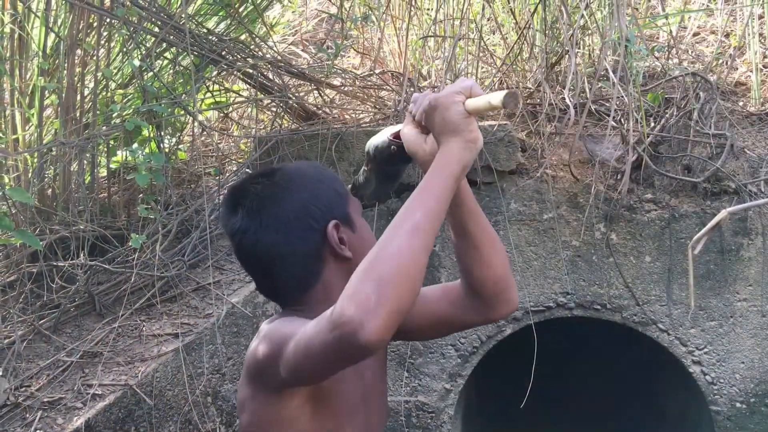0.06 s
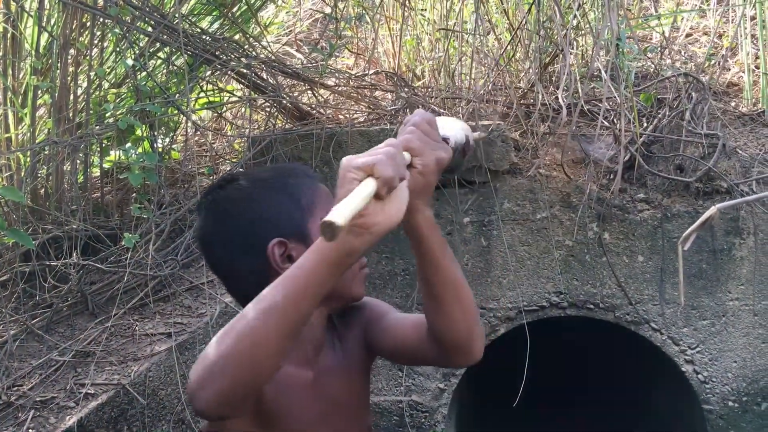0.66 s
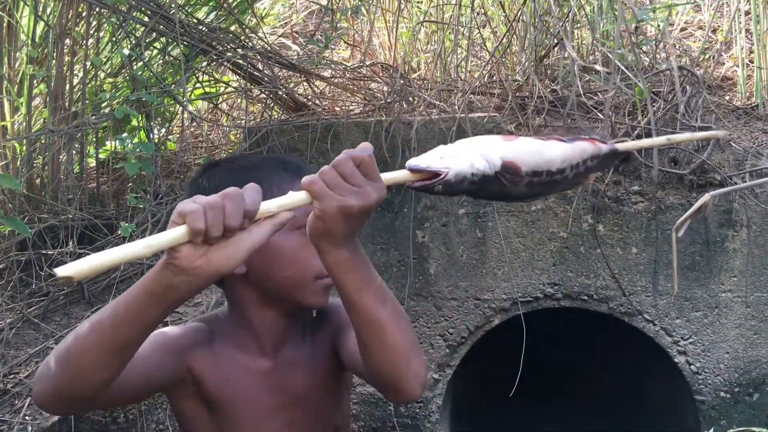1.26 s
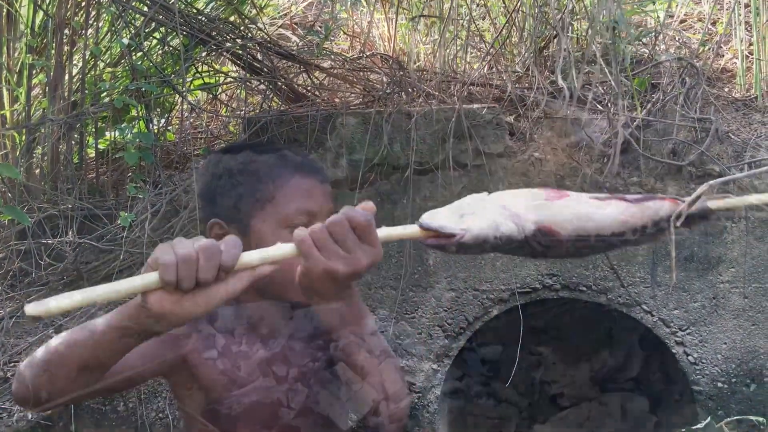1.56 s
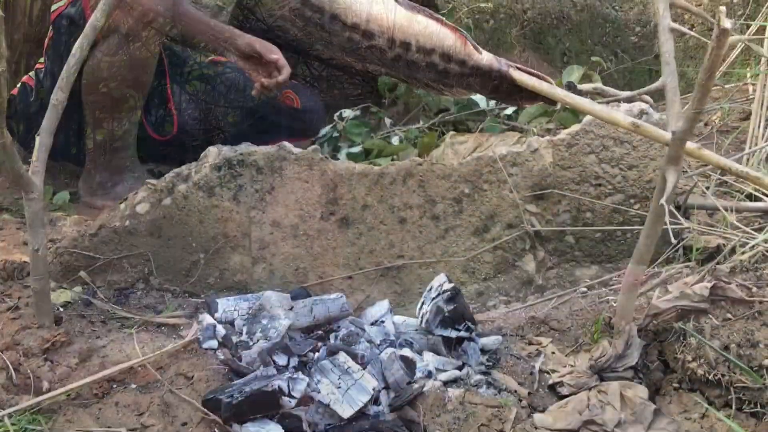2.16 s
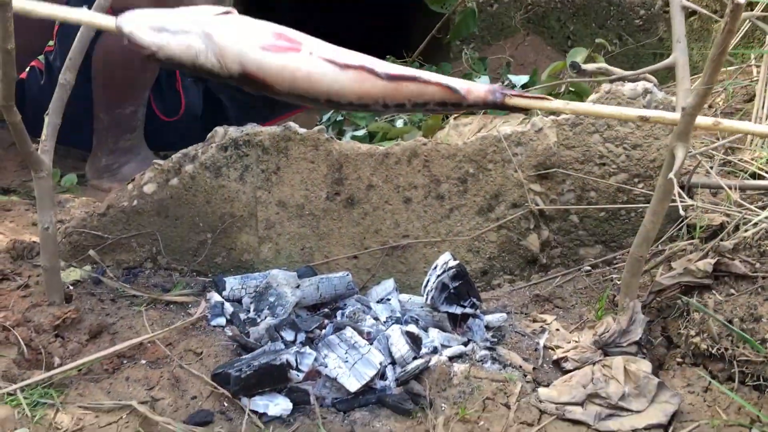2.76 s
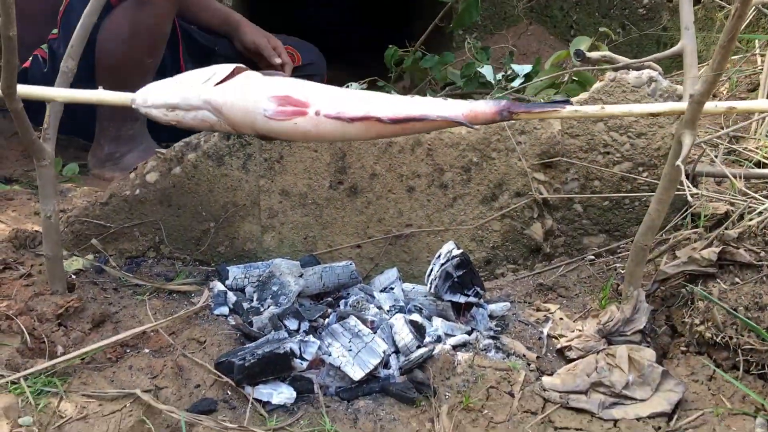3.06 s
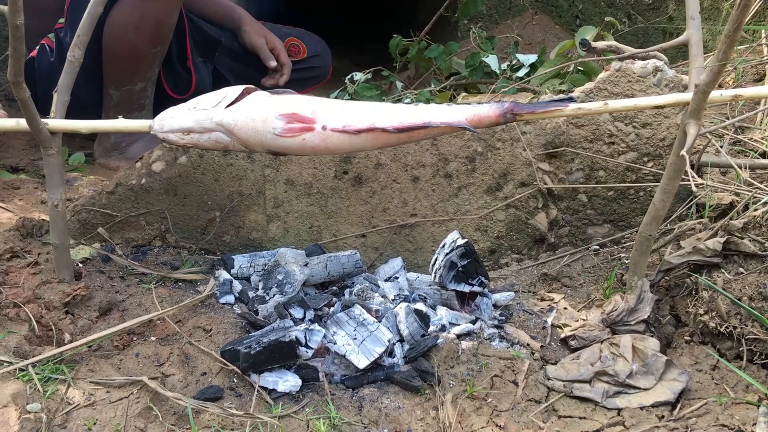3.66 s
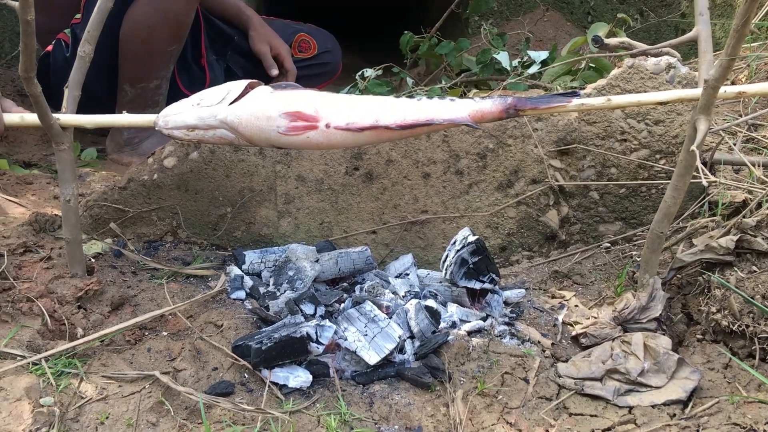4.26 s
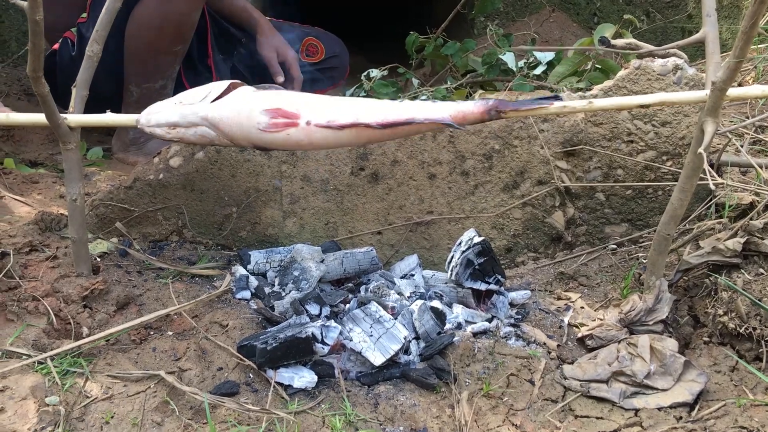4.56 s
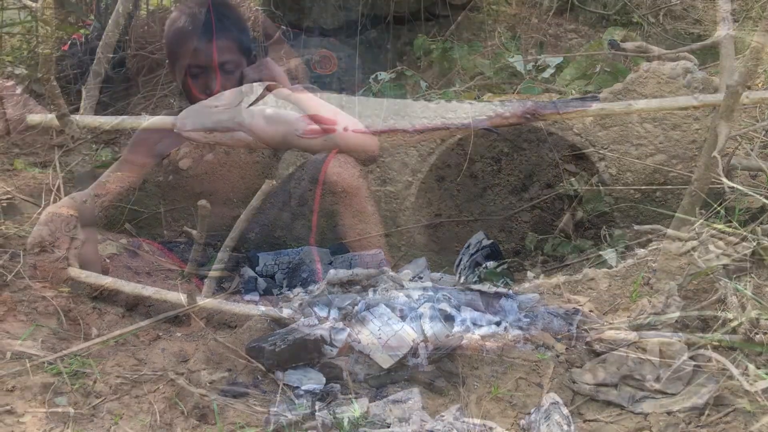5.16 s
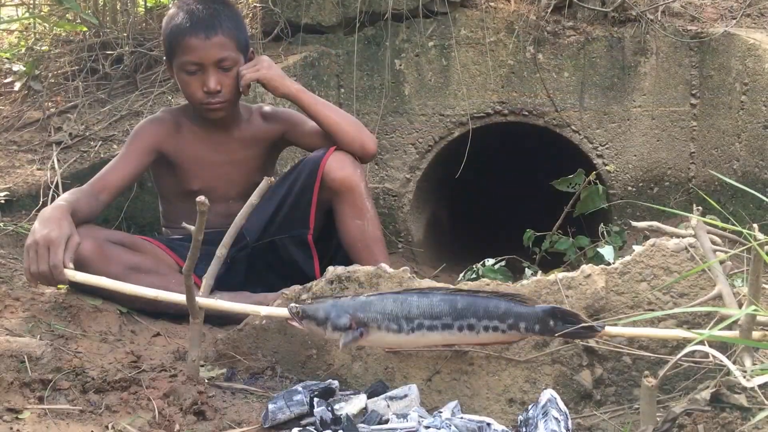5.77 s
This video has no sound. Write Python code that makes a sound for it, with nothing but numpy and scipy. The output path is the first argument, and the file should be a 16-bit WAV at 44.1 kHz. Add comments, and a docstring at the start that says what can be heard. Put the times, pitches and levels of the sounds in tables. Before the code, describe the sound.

Close, irregular cracks and soft hissing from hot coals outdoors, while a far engine thuds faintly in the breeze.

```python
"""Sharp, close snaps of glowing charcoal, with spurts of hiss, a fine fizz and faint ticks, outdoors.
The snaps come from coals cracking, and the loudest overload the microphone; tiny cracks make the fizz,
flaking ash the ticks. Far off, a slow one-cylinder pump engine thuds. Low wind blows and dry brush
rustles. Birds chirp, peep and hoot, insects drone and trill, and a faint hum comes and goes."""
import sys
import numpy as np
from scipy import signal
from scipy.fft import rfft, irfft
from scipy.io import wavfile
from scipy.ndimage import uniform_filter1d

SR = 44100
rng = np.random.default_rng(int(sys.argv[2]) if len(sys.argv) > 2 else 0)


def master(y):
    """Save y as 16-bit WAV."""
    cut = np.clip(np.atleast_2d(y).T, -1, 1)
    pcm = np.round(cut * 32767)  # scale
    wavfile.write(sys.argv[1], SR, pcm.astype(np.int16))


N = 255764
TIME = np.arange(N) / SR

# Steady fizz of the coals. Each row: time in seconds, relative level in dB.
GLOW_LEVEL = [(0, -55.5), (.32, -59.5), (.36, -48), (1.2, -46), (1.9, -48.5), (4.7, -52), (5.35, -52.5),
              (5.8, -58)]


def coal_snaps(body_hz=1900, crack_t60_s=0.004, resonance_db=9.0, resonance_octaves=0.17,
               crumble_db=-10, scatter_db=-15, scatter_t60_s=0.066, far_db=-29, far_t60_s=0.18):
    """Sharp snaps of coal (release, tiny fractures, scatter), and two short spurts of hiss near 0.8 s."""
    # Each row: start in seconds, relative level in dB, thump (below 700 Hz), knock (near 1.2 kHz) and
    # top (above 8 kHz) in dB, crumbling t60 in seconds, the piece's resonance in Hz.
    snaps_and_spurts = [(0.103, -38.5, -11, 6, 14, 0.013, 11700), (0.2013, -40, -12, -8, -3, 0.0084, 5270),
                        (0.343, -6.5, -6.5, -3.5, -2, 0.0064, 4700),
                        (0.3482, -11.5, -4, -4.5, -8.5, 0.022, 4500),
                        (0.505, -19, -22, -4, 2, 0.0068, 7400),
                        (0.69, -18.5, -21, -10.5, -4, 0.0056, 13500),
                        (0.6995, -28.5, -12, -9, -2, 0.006, 5000),
                        (0.7567, -15.5, -36, -6, -4.5, 0.0077, 9300),
                        (0.765, -20.5, -7, -14, 1, 0.025, 2900.0),
                        (0.806, -28, -15, -12, -2.5, 0.058, 6500.0), (0.8866, -31, -4, -5, 0, 0.006, 4430),
                        (1.011, -13.5, -7, -2.5, 2, 0.011, 9100), (1.0174, -22, -7, -7, -5, 0.0051, 9750),
                        (1.2792, -29.5, -15, -11, -8, 0.0065, 15000.0),
                        (1.3012, -11, -30, -9, -0.5, 0.0075, 4800), (1.363, -10.5, 5, -5, 1.5, 0.015, 4260),
                        (1.4778, -3, -1.5, -1, -10, 0.014, 1190), (1.525, -27.5, -8, -8, -3, 0.01, 11800.0),
                        (1.6067, -6, 0.5, -2.5, -1, 0.021, 6540),
                        (1.7944, -29.5, -17, -5.5, -1.5, 0.0058, 7260),
                        (2.0132, -12.5, -8, -12.5, 1, 0.014, 2900),
                        (2.1863, -1, -0.5, -9.5, -9, 0.017, 3240),
                        (2.2872, -10, -8.5, -6.5, -4.5, 0.0089, 8150),
                        (2.3032, -16, -17, -12, 1, 0.0058, 3700), (2.3528, -8.5, -8, -13.5, 5, 0.013, 3700),
                        (2.5502, -30, -3, -16, -3, 0.0057, 5700), (2.6806, -35, -6, -10, -1, 0.049, 5100.0),
                        (3.214, -35.5, -11.0, -12.0, -1.5, 0.008, 11200),
                        (3.244, -36, -12, -22, -2, 0.011, 11300.0),
                        (3.429, -22, 1.5, -11, 0.5, 0.009, 6700), (3.7294, -34, -10.0, -25, 4, 0.02, 4270),
                        (3.7589, -26, -19, -0.5, 0, 0.011, 2600.0),
                        (3.8243, -42, -6.0, -2, 12, 0.009, 2600.0),
                        (4.2628, -40.1, -11, -13.0, 4, 0.017, 12700.0),
                        (4.6053, -31.5, -4, -31, -1, 0.0058, 7850),
                        (4.642, -27, -10, -11.5, 1, 0.025, 2400.0)]
    # Spectrum common to all of them. Each row: frequency in Hz, gain in dB.
    snap_spectrum = [(40, -15.5), (130, -6.5), (260, 1.5), (480, 2), (720, 1.5), (1000, 2.5), (1750, 0.5),
                     (2300, -4), (2750, -11.5), (3400, -2.5), (7000, -1.5), (9200, 0), (10600, -3),
                     (14500, 1)]
    size = 8192
    out, t = np.zeros(N), np.arange(size) / SR
    bin_hz = np.arange(size // 2 + 1) * SR / size + 1
    lowpass, highpass = (signal.butter(2, body_hz, kind, fs=SR) for kind in ("low", "high"))
    release = signal.lfilter(*lowpass, signal.unit_impulse(size))
    common_db = spectrum_db(snap_spectrum, size)

    def burst(t60_s):
        """Fading noise of unit energy."""
        noise = rng.uniform(-1.1, 1, size) * undb(-60 * t / t60_s)
        return noise / np.linalg.norm(noise)

    for start_s, level_db, thump_db, knock_db, top_db, crumble_t60_s, piece_hz in snaps_and_spurts:
        crack = release + signal.lfilter(*highpass, burst(crack_t60_s))
        # Longer crumbling is louder and scatters more sound off ground and wall.
        heft = crumble_t60_s / 0.0059
        tail = heft * undb(crumble_db) * burst(crumble_t60_s) + undb(far_db) * burst(far_t60_s)
        tail += undb(scatter_db + 3 * np.log2(heft)) * burst(scatter_t60_s)
        tail = signal.lfilter(*signal.butter(1, 650, "high", fs=SR), tail)
        # Each piece has its own colour; the tail keeps only a share of it.
        balance = [(480, thump_db), (950, knock_db), (1800, knock_db),
                   (3600, 0), (7000, 0), (10500, top_db)]
        peak_db = resonance_db / (1 + (np.log2(bin_hz / piece_hz) / resonance_octaves) ** 2)
        piece_db = spectrum_db(balance, size) + peak_db
        sound = ring(crack, common_db + piece_db) + ring(tail, common_db + 0.7 * piece_db)
        attack_rms = np.sqrt(np.mean(sound[:SR // 333] ** 2))  # first 3 ms
        add(out, start_s, sound * undb(level_db + 3.0) / attack_rms)
    return out


def ember_fizz(grains_per_s=600, grain_t60_s=0.0028, flutter_db=1.68):
    """Countless tiny cracks merge into a fizz; the louder it grows, the grittier it gets."""
    # Swells of hiss. Each row: peak time in seconds, half width in seconds, relative level in dB.
    spurts = [(0, 0.022, -45.5), (.51, 0.052, -45), (.775, 0.1, -41), (.985, 0.064, -39.5),
              (2.24, 0.038, -44.5), (2.5, 0.18, -47), (4.56, .06, -50.5)]
    # Each row: frequency in Hz, gain in dB.
    fizz_spectrum = [(1200, -10.5), (2800, -5.5), (3800, -1), (5000, -2), (6800, 1.5), (7900, -3.5),
                     (9200, 1), (10400, -7), (11800, -0.5), (15500, -4.5)]
    power = undb(curve(GLOW_LEVEL)) ** 2
    for peak_s, width_s, spurt_db in spurts:
        power += undb(spurt_db) ** 2 * np.exp(-((TIME - peak_s) / width_s) ** 2)
    fizz_db = 10 * np.log10(power)
    cracks = rng.random(N) < grains_per_s / SR
    crack_db = 4.2 * np.minimum(rng.exponential(size=N), 4.5)
    t = np.arange(SR // 200) / SR
    grain = np.sign(rng.standard_normal(len(t))) * undb(-60 * t / grain_t60_s)
    grains = signal.fftconvolve(cracks * undb(crack_db), grain)[:N]
    grit = undb(-6 + 0.4 * (fizz_db + 46))  # ratio of grains to smooth hiss
    fizz = (rng.standard_normal(N) + grit * unit(grains)) / np.sqrt(1 + grit ** 2)
    return colour(fizz, fizz_spectrum) * undb(fizz_db + 1.1 + flutter_db * walk(40))


def ash_ticks(ticks_per_s=8, over_glow_db=2.0, spread_db=7, low_hz=6500, high_hz=14000, t60_s=0.008):
    """Ash flakes spring off at random: faint, bright ticks that grow and fade with the glow."""
    out, t = np.zeros(N), np.arange(SR // 100) / SR
    for when, pitch, weakness in rng.random((int(ticks_per_s * N / SR), 3)):
        flake_hz = low_hz * (high_hz / low_hz) ** pitch
        burst = rng.standard_normal(len(t)) * undb(-60 * t / t60_s)
        tick = signal.lfilter(*signal.iirpeak(flake_hz, 2, fs=SR), burst)
        add(out, when * N / SR, unit(tick) * undb(over_glow_db - spread_db * weakness))
    return out * undb(curve(GLOW_LEVEL))


def pump_engine(firings_per_s=8.1, exhaust_hz=60, sag=0.22, thud_width_s=0.014,
                knock_hz=315, knock_lag_s=0.016, knock_width_s=0.0032):
    """Each firing gives a soft exhaust thud that sags in pitch, with a knock just after it."""
    # Steady running. Each row: first firing in seconds, end in seconds, exhaust in dB, knock in dB.
    stretches = [(.013, 2.3, -45.5, -65), (2.361, 4.63, -49, -63), (4.665, 5.8, -46.5, -56.5)]
    out, t = np.zeros(N), np.arange(SR // 8) / SR
    lead_s = 0.05
    age_s = t - lead_s  # zero at the thud's peak
    thud_envelope = np.exp(-0.5 * (age_s / thud_width_s) ** 2)
    knock_envelope = np.exp(-0.5 * ((age_s - knock_lag_s) / knock_width_s) ** 2)
    phase = 2 * np.pi * np.cumsum(exhaust_hz * np.exp(-sag * age_s / lead_s)) / SR
    for start_s, end_s, exhaust_db, knock_db in stretches:
        for firing_s in np.arange(start_s, end_s, 1 / firings_per_s):
            late, strong, thud_detune, hard, knock_detune = rng.standard_normal(5)
            thud = unit(thud_envelope * np.sin(phase * (1 + 0.13 * thud_detune)))
            knock = unit(knock_envelope * np.sin(2 * np.pi * knock_hz * (1 + 0.049 * knock_detune) * t))
            firing = thud * undb(exhaust_db + 0.9 * strong) + knock * undb(knock_db + 2.4 * hard)
            add(out, firing_s - lead_s + 0.0019 * late, firing)
    return out


def breeze(bout_edge_s=0.034):
    """Low wind and the rustle of dry brush, each fluttering on its own."""
    # Each row: time in seconds, relative level in dB.
    wind_level = [(0, -51.5), (.6, -51), (.85, -48.5), (1.75, -49.5), (2.25, -46), (2.85, -50.5),
                  (4.2, -50), (4.55, -46), (4.75, -53), (5.8, -50.5)]
    # Each row: start in seconds, end in seconds, relative level in dB.
    rustle_bouts = [(.345, 1.905, -49), (.95, 1.04, -44), (1.03, 1.15, -49), (2.19, 2.68, -52.5),
                    (4.72, 6.1, -58)]
    # Each row of both spectra: frequency in Hz, gain in dB.
    wind_spectrum = [(20, -29), (45, 0.5), (110, 4), (190, -3.5), (330, -5), (450, -12), (900, -22.5),
                     (2000, -41)]
    rustle_spectrum = [(200, -29), (400, -2), (580, 2), (780, -1.5), (1100, 0), (1600, -2.5), (2600, -5),
                       (4000, -11), (9000, -34)]
    rustle_power = undb(-58) ** 2  # floor between bouts
    for start_s, end_s, bout_db in rustle_bouts:
        rustle_power += (undb(bout_db) * gate(start_s, end_s, bout_edge_s)) ** 2
    wind = colour(rng.standard_normal(N), wind_spectrum)
    rustle = colour(rng.standard_normal(N), rustle_spectrum)
    wind *= undb(curve(wind_level) + 3.0 + 0.85 * walk(14))
    rustle *= np.sqrt(rustle_power) * undb(1.5 + 0.76 * walk(24.91))
    return wind + rustle


def faint_hum(hz=188.8, level_db=-55):
    """A low tone that sets in, wavers and stops."""
    return tone(hz, undb(level_db) * gate(1.92, 3.8), waver=0.0142, waver_per_s=14, flutter_db=2.1)


def bird_chirp():
    """Two notes swell and fade while their pitch climbs, fast at first, then levelling off."""
    # Each row: start in seconds, length in seconds, first and last pitch in Hz, level in dB.
    notes = [(4.291, .1, 5550, 6610, -41), (4.37, .055, 6900, 8000, -53)]
    out = np.zeros(N)
    for start_s, length_s, first_hz, last_hz, level_db in notes:
        progress = np.clip((TIME - start_s) / length_s, 0, 1)
        hz = last_hz + (first_hz - last_hz) * (1 - progress) ** 1.7
        gain = undb(level_db) * np.sin(np.pi * progress)
        out += tone(hz, gain, waver=0.012, waver_per_s=440, flutter_db=2.1)
    return out


def bird_peeps(hz=2800, attack_s=0.0041, t60_s=0.045, lower_db=-13):
    """A far bird's quick, rough peeps, with a weaker partial an octave below."""
    # Each row: start in seconds, level in dB.
    peeps = [(5.625, -40), (5.66, -53), (5.735, -53.5)]
    gain = np.zeros(N)
    for start_s, level_db in peeps:
        rise = np.clip((TIME - start_s) / attack_s, 0, 1)
        decay_db = 60 * np.maximum(TIME - start_s - attack_s, 0) / t60_s
        gain += rise * undb(level_db - decay_db)
    upper = tone(hz, gain, waver=0.046, waver_per_s=700, flutter_db=2.9)
    lower = tone(hz / 2, gain * undb(lower_db), waver=0.041, waver_per_s=700, flutter_db=2.8)
    return upper + lower


def bird_hoot(hz=525, level_db=-59):
    """One short, far hoot."""
    return tone(hz, undb(level_db) * gate(0.08, 0.32), waver=0.0315, waver_per_s=82, flutter_db=2.5)


def foliage_echo(calls, echo_db=-7, t60_s=0.26):
    """Leaves and a wall smear distant calls into a short tail."""
    t = np.arange(SR // 4) / SR
    tail = rng.standard_normal(len(t)) * undb(-60 * t / t60_s)
    return calls + undb(echo_db) * signal.fftconvolve(calls, tail / np.linalg.norm(tail))[:N]


def insects(trill_hz=9200, trill_db=-63, drone_hz=7100, drone_db=-65):
    """One insect's thin trill and the drone of others in the brush."""
    trill = tone(trill_hz, undb(trill_db) * gate(5.63, 5.9), waver=0.014, waver_per_s=980, flutter_db=2.3)
    drone = tone(drone_hz, undb(drone_db) * gate(1.9, 4.5), waver=0.02, waver_per_s=1100, flutter_db=3.6)
    return trill + drone


def tone(hz, gain, waver, waver_per_s, flutter_db):
    """A sine that wanders in pitch and level; waver is the rms fraction of the pitch."""
    phase = 2 * np.pi * np.cumsum(hz * (1 + waver * walk(waver_per_s))) / SR
    return np.sqrt(2) * np.sin(phase) * gain * undb(flutter_db * walk(200))


def gate(start_s, end_s, edge_s=0.06):
    """Trapezoid envelope."""
    return np.clip(np.minimum(TIME - start_s, end_s - TIME) / edge_s + 0.5, 0, 1)


def walk(steps_per_s):
    """Random steps, smoothed twice, at rms 1."""
    hold = max(int(SR / steps_per_s), 1)
    steps = np.repeat(rng.standard_normal(N // hold + 1), hold)
    return unit(uniform_filter1d(uniform_filter1d(steps, hold), hold)[:N])


def curve(points):
    """(s, value) points joined over time."""
    return np.interp(TIME, *np.transpose(points))


def spectrum_db(points, size):
    """(Hz, dB) points joined on a log-frequency axis."""
    hz, db = np.transpose(points)
    return np.interp(np.log(np.arange(size // 2 + 1) * SR / size + 1), np.log(hz), db)


def colour(x, points):
    """Filter a full-length signal by (Hz, dB) points, to rms 1."""
    return unit(irfft(rfft(x) * undb(spectrum_db(points, N)), N))


def ring(x, gain_db):
    """Minimum-phase filter with the given gain per frequency bin."""
    size = len(x)
    cepstrum = irfft(np.log(undb(gain_db)), size)
    cepstrum[1:size // 2] *= 2
    cepstrum[size // 2 + 1:] = 0
    return irfft(rfft(x) * np.exp(rfft(cepstrum)), size)


def add(out, start_s, sound):
    """Mix a short sound in at start_s."""
    at = int(round(start_s * SR)) + np.arange(len(sound))
    inside = (at >= 0) & (at < N)
    out[at[inside]] += sound[inside]


def undb(db):
    """Decibels to gain."""
    return 10 ** (np.asarray(db) / 20)


def unit(x):
    """Scale to rms 1."""
    return x / np.sqrt(np.mean(x ** 2) + 1e-18)


def scene():
    """Close coals over the breeze, the pump and the wildlife, in mono."""
    coals = coal_snaps() + ember_fizz() + ash_ticks()
    outdoors = breeze() + pump_engine() + faint_hum()
    birds = foliage_echo(bird_chirp() + bird_peeps() + bird_hoot())
    return (coals + outdoors + birds + insects())[None]


def record(dry):
    """The loudest snaps clip; a steep low-pass cuts above 16 kHz."""
    lowpass = signal.ellip(10, 0.2, 70, 16000, fs=SR, output="sos")
    return signal.sosfilt(lowpass, np.clip(dry, -1, 1))


dry = scene()
out = record(dry)
master(out)
```